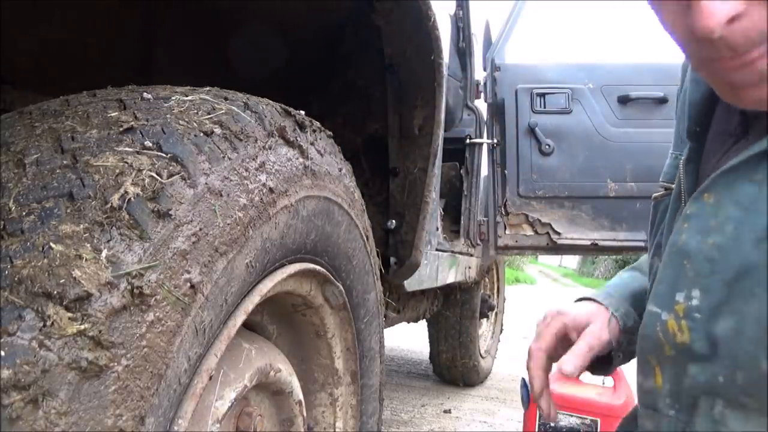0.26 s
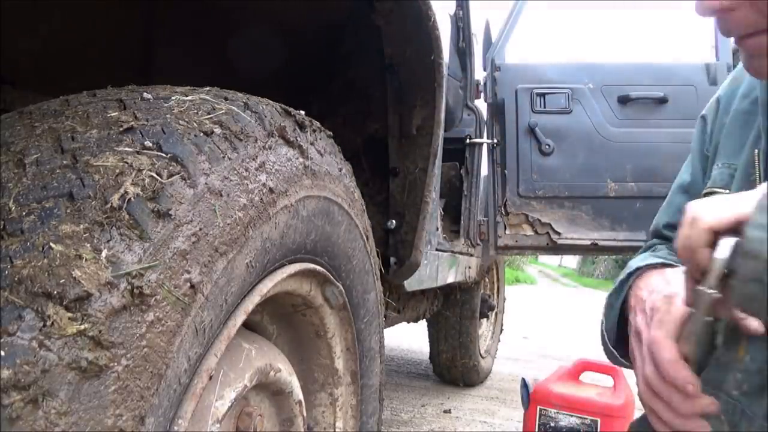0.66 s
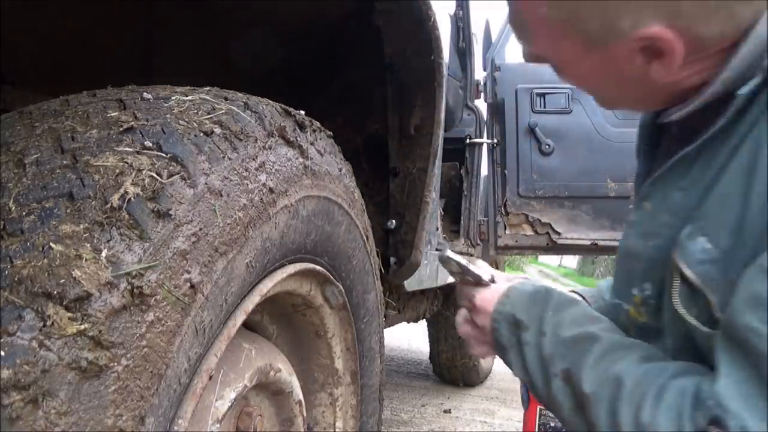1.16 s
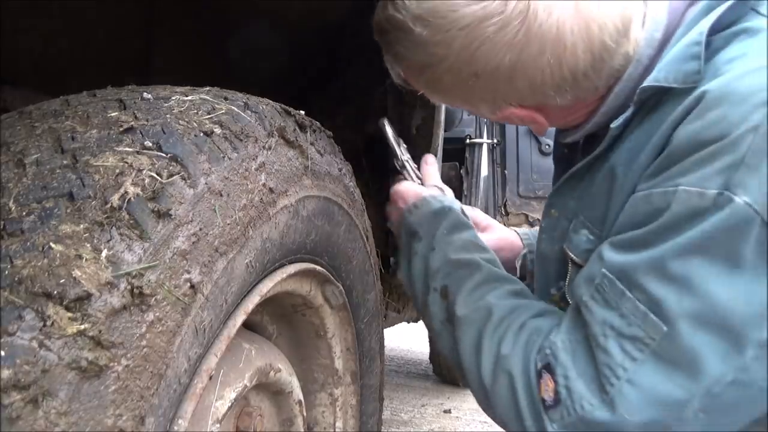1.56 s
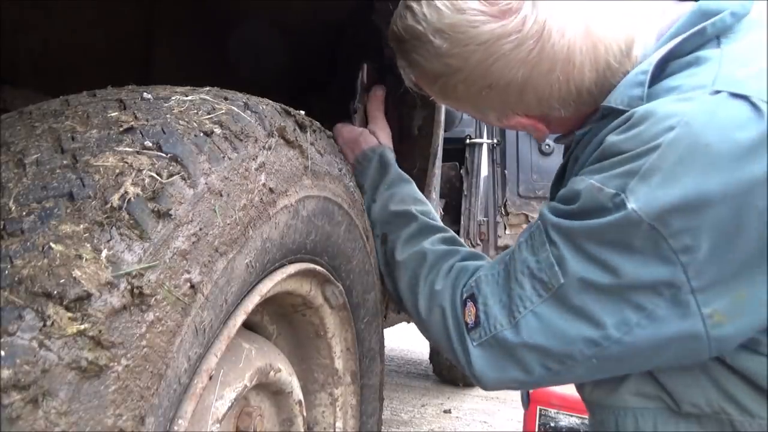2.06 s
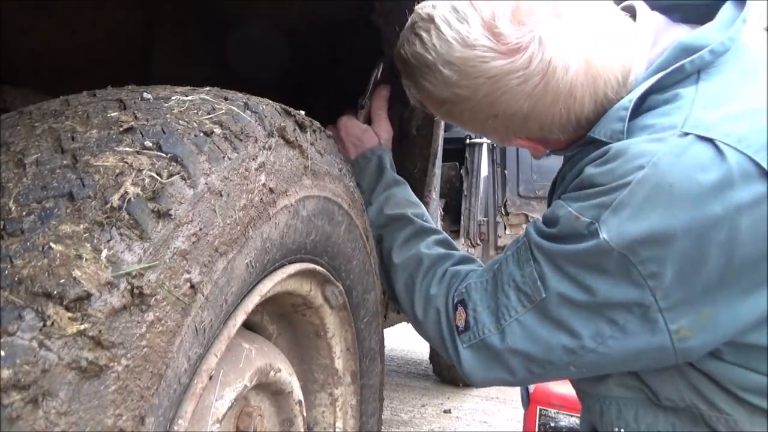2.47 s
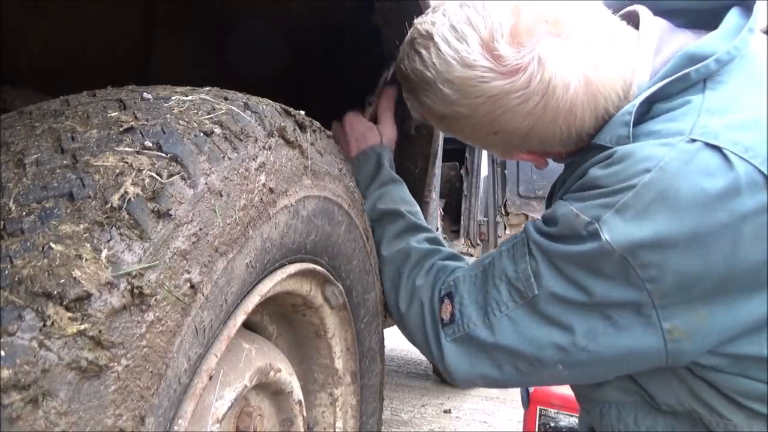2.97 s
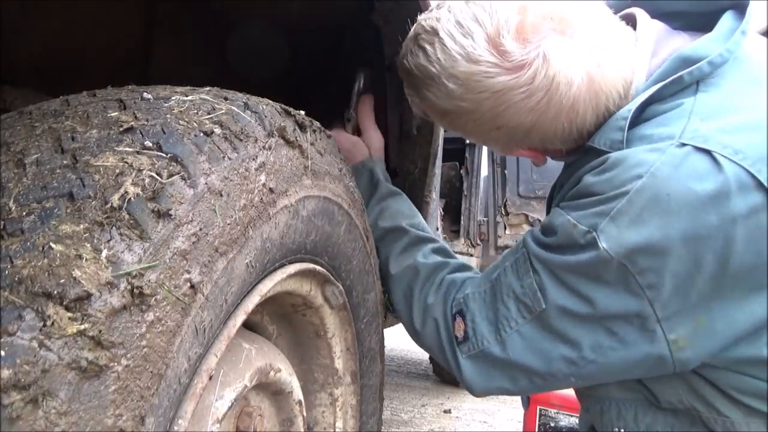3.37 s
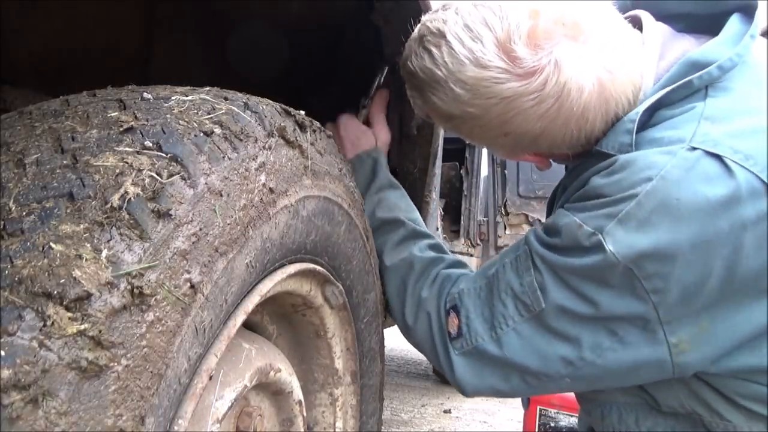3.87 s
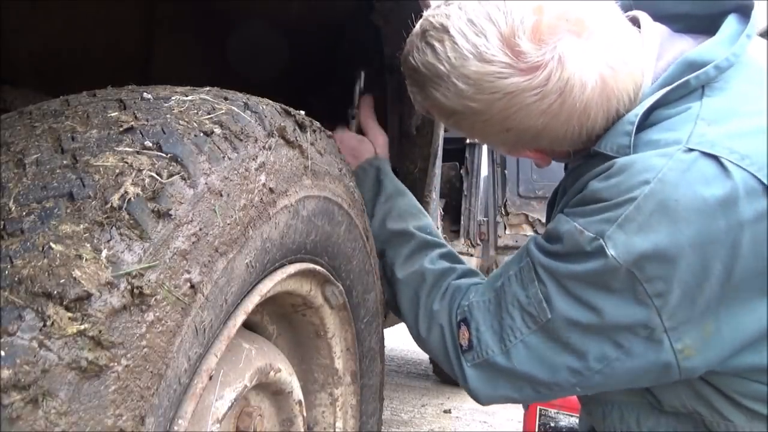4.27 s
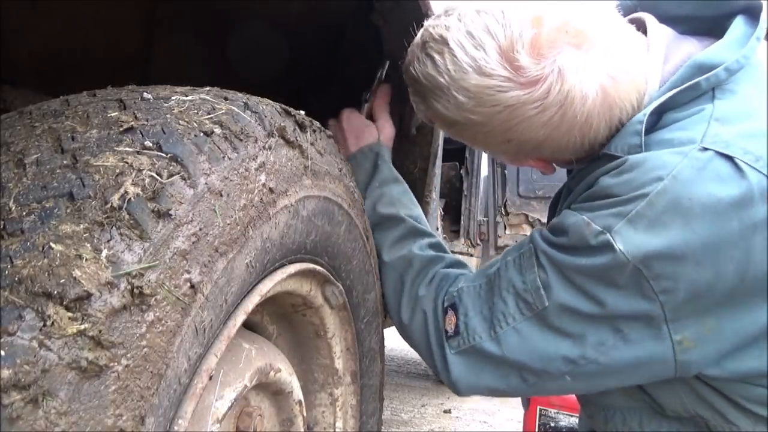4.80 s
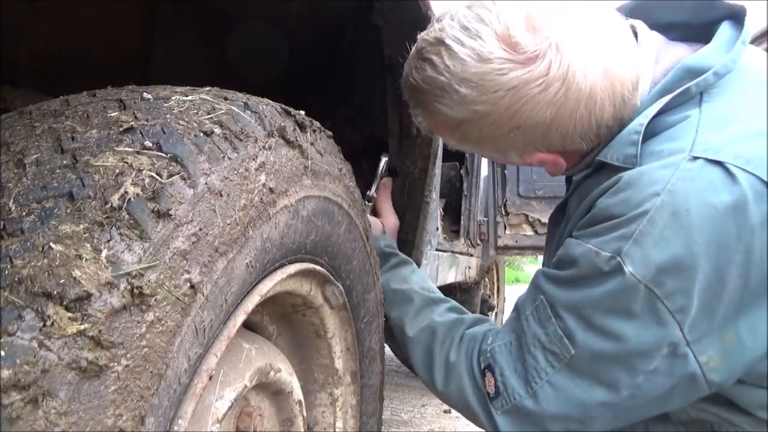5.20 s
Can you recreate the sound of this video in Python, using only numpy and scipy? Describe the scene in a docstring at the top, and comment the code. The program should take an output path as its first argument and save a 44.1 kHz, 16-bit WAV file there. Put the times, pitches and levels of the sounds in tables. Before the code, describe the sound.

Metal hand tools clatter, a jacket rustles with soft wind bumps, then a steel tool strikes metal bodywork in steady sharp blows outdoors.

```python
"""Steel tool on vehicle bodywork

Outdoors, close beside a vehicle, on a two-port microphone: hand tools clatter, a jacket rustles,
then a steel tool strikes pins in the bodywork, each blow a cluster of contacts.
Contacts are decaying noise bands plus ringing modes: a bright crack, a knock of sheet metal, a hollow boom.
Dull thumps, a faint tone, cloth and light wind on the microphone lie over a quiet open-air floor.
Table levels in dB are relative: later gains and filters shift them."""
import sys
import numpy as np
from scipy import signal
from scipy.fft import rfft, irfft
from scipy.io import wavfile

SR = 44100
rng = np.random.default_rng(int(sys.argv[2]) if len(sys.argv) > 2 else 0)


def ratio(d):
    """dB to gain"""
    e = np.asarray(d, float) / 20
    return 10 ** e


def to_wav(s):
    """Save 16-bit WAV."""
    ch = np.atleast_2d(s).T  # columns
    pcm = np.round(np.clip(ch, -1, 1) * 32767)  # PCM
    wavfile.write(sys.argv[1], SR, pcm.astype(np.int16))


N = 239990   # samples


def in_time(rows):
    """Turn the columns of a timed table into sample-rate curves by straight lines."""
    start_s, *columns = np.transpose(rows)
    return [np.interp(np.arange(N) / SR, start_s, column) for column in columns]


def at_hz(points, hz):
    """Read a two-column table on a log-frequency axis."""
    knots_hz, values = np.transpose(points)
    return np.interp(np.log(hz), np.log(knots_hz), values)


def rms_one(x):
    """Scale to unit rms."""
    return x / np.sqrt(np.mean(x ** 2) + 1e-20)


def drift(rate_hz):
    """Random wander of unit rms: noise through two equal low-pass poles at rate_hz."""
    pole = np.exp(-80 * np.pi * rate_hz / SR)   # computed at every 40th sample
    noise = rng.standard_normal(N // 40 + 2002)
    slow = signal.lfilter([1], [1, -2 * pole, pole * pole], noise)[2000:]
    return np.interp(np.arange(N) / 40, np.arange(len(slow)), rms_one(slow))


def clicks(seconds, sizes):
    """Single-sample clicks of the given sizes."""
    return np.bincount((np.asarray(seconds) * SR).astype(int), sizes, N) + 1e-18


def fade(x, t60_s):
    """Every click becomes an exponential decay."""
    return signal.lfilter([1], [1, -ratio(-60 / (t60_s * SR))], x)


def swell(x, seconds):
    """Contact builds up over a short time constant instead of at once."""
    pole = np.exp(-1 / (seconds * SR))
    return signal.lfilter([1 - pole], [1, -pole], x)


def ring(x, hz, t60_s):
    """A resonance: a unit click sets a decaying sine of starting height 1 ringing."""
    radius, turn = ratio(-60 / (t60_s * SR)), 2 * np.pi * hz / SR
    return signal.lfilter([0, np.sin(turn)], [1, -2 * radius * np.cos(turn), radius * radius], x)


# edges of the noise bands [Hz]
BAND_EDGES_HZ = 25 * 2 ** np.arange(0, 9.5, .4)


def bank(envelope, likeness):
    """Stereo noise in narrow bands; envelope(hz) shapes each before its filter, so nothing sounds early."""
    out = 0
    white = rng.standard_normal((2, 2, N))   # neighbouring bands take different noise
    for k, (low, high) in enumerate(zip(BAND_EDGES_HZ, BAND_EDGES_HZ[1:])):
        hz = np.sqrt(low * high)
        band = signal.butter(2, [low, high], "band", fs=SR, output="sos")
        mid, side = signal.sosfilt(band, white[k % 2] * envelope(hz))
        alike = np.clip(at_hz(likeness, hz), 0, 1)
        out = out + np.sqrt(1 + alike) * mid + np.sqrt(1 - alike) * side * [[1], [-1]]
    return out


def colour_db(levels, knots_hz, hz):
    """Level of each contact at one frequency, between its colour knots."""
    return np.array([np.interp(np.log(hz), np.log(knots_hz), row) for row in levels])


def modes(seconds, levels, knots_hz, table, level_db, spread_db, side, rough):
    """Each contact strikes every mode with its own strength; close neighbours make each ring waver."""
    out = np.zeros((2, N))
    for hz, mode_db, t60_s in table:
        chance_db = spread_db * rng.standard_normal(len(seconds))
        strike_db = colour_db(levels, knots_hz, hz) + mode_db + level_db + chance_db
        waver = 1 - rough + rough * drift(50.6)
        tone = ring(clicks(seconds, ratio(strike_db)), hz, t60_s) * waver
        # a wide panel reaches the two ports with a phase offset: add a copy a quarter period late
        late = np.roll(tone, int(SR / hz / 4))
        out += tone + side * rng.choice([-1, 1]) * late * [[1], [-1]]
    return out


def cut_bass(x):
    """Panels radiate nothing below their first mode."""
    return signal.sosfilt(signal.butter(6, 148, "high", fs=SR, output="sos"), x)


def rattle():
    """Loose parts chatter in the tail: a fast random level."""
    return ratio(1.5 * drift(120))


# contacts on the bodywork: start_s [s], sparkle_db near 8 kHz [dB],
# then relative to it: boom_db near 250 Hz [dB], knock_db near 700 Hz [dB]
BLOWS = [(2.7764, -21, -5, 2.5), (2.7788, -13, -6, 6), (3.0533, -11, -12.5, 6), (3.0592, -24.5, 3.5, -5),
         (3.0699, -23, 13.5, 0), (3.3380, -13, 11, 7), (3.346, -15.5, -7, -23), (3.3580, -17, 2.5, 5.5),
         (3.3621, -17, 7, -18.5), (3.419, -36, 11, 7), (3.6296, -8.5, 0.5, -1), (3.66, -15, -10, -9.5),
         (3.798, -55, 23, 21.5), (3.9090, -7, -8.5, 5), (4.1660, -19.5, 5, 5.5),
         (4.1700, -3.5, -8.5, -15.5), (4.1769, -10, -0.5, -5), (4.2524, -24, -10, 6),
         (4.2694, -10, -29, -6), (4.275, -18, 12, -2), (4.307, -56, -4, 4), (4.3160, -29.5, -10, 5),
         (4.5812, -17.5, -2, 3), (4.5831, -4.5, -15.5, -15), (4.5899, -8, -2, -23), (4.8668, -6.5, 3.5, 5),
         (5.1332, -50, 1, 6.5)]
# colour knots of a blow: boom, knock, crack, sparkle, top [Hz]
BLOW_KNOTS_HZ = [250, 700, 3500, 8500, 13000]
# clear modes of the bodywork: pitch_hz [Hz], level_db [dB], t60_s [s]
BODY_MODES = [(167.3, 2.5, 0.22), (205.7, -8, 0.17), (278, 2.5, 0.1), (345.7, -4.5, 0.17),
              (364.7, -17.5, 0.19), (572, -7, .11), (640, -7, .12), (750, -5, .11), (890, -8, .1),
              (1009, -12, .09), (1277, -12, .07), (1450, -10, .07), (1605, -10, .06), (1760, -10, .07),
              (1880, -11, .07), (2068, -13, .06)]
# dense modes of the bodywork: frequency_hz [Hz], density_db [dB per Hz]
BODY_NOISE = [(47, 40), (80, -26.5), (159, -9.5), (441, -12.5), (751, -7), (1170, -26), (1600, -10),
              (2220, -20), (5640, -22.5), (9610, -16.5), (16000, -19)]
# decay of the crack: frequency_hz [Hz], t60_s [s]
CRACK_T60 = [(100, 0.12), (500, 0.14), (2000, 0.031), (8000, 0.02), (15000, 0.0083)]
# decay of the longer tail: frequency_hz [Hz], t60_s [s]
TAIL_T60 = [(100, 0.79), (300, 0.74), (1000, 0.32), (4000, 0.15), (12000, 0.09)]
# contacts at the microphone, blows and clinks: frequency_hz [Hz], left-right likeness [0 to 1]
CONTACT_LIKENESS = [(100, 1), (500, 0.94), (2000, 0.76), (12000, 0.94)]


def blows():
    """Tool on pins: a snap, a crack and a longer tail of dense modes by band, plus clear body and tool modes."""
    start_s, sparkle_db, boom_db, knock_db = np.transpose(BLOWS)
    # a contact that knocks the sheet also cracks more near 3.5 kHz and has less of the very top
    crack_db = 4 + 0.49 * knock_db
    top_db = -14.5 - 0.64 * knock_db
    colour = np.transpose([boom_db, knock_db, crack_db, 0 * start_s, top_db])
    levels = sparkle_db[:, None] + colour
    chatter = rattle()

    def envelope(hz):
        hit_db = colour_db(levels, BLOW_KNOTS_HZ, hz) + at_hz(BODY_NOISE, hz) + 12.5
        hit = clicks(start_s, ratio(hit_db))
        snap = ratio(2.5) * fade(hit, 0.007) / (1 + (2500 / hz) ** 2)
        crack = fade(hit, at_hz(CRACK_T60, hz))
        tail = ratio(-13.5) * chatter * fade(hit, at_hz(TAIL_T60, hz))
        return swell(snap + crack + tail, 0.00042)

    body = modes(start_s, levels, BLOW_KNOTS_HZ, BODY_MODES, level_db=-5, spread_db=3.0, side=0.065, rough=0.27)
    sheet = cut_bass(bank(envelope, CONTACT_LIKENESS) + swell(body, 0.00005))
    return sheet + held_tool(start_s, levels[:, 1:])   # the tool takes all but the boom


# modes of the steel tool: pitch_hz [Hz], level_db [dB], t60_s when hanging free [s]
TOOL_MODES = [(2800, -10, .1), (3838, -11, .12), (4250, -12, .35), (4520, -12, .4), (4888, -13, .35),
              (5076, -13, .35), (6223, -13, .35), (7397, -12, .3), (7644, -7, .13), (7850, -8, .15),
              (8328, -12, .35), (8576, -12, .35), (9300, -9, .15), (9523, -8, .13), (10380, -12, .35),
              (10900, -13, .25), (11410, -12, .15)]
# colour knots of a clink, and of the held tool: knock, middle, sparkle, top [Hz]
CLINK_KNOTS_HZ = [1300, 4000, 8500, 13000]


def held_tool(seconds, levels):
    """Gripped, the tool rings only briefly at every contact."""
    held = [(hz, db, 0.027) for hz, db, t60_s in TOOL_MODES]
    return modes(seconds, levels, CLINK_KNOTS_HZ, held, level_db=-11, spread_db=7.5, side=0.2, rough=0.44)


# tools touching each other: start_s [s], level_db near 4 kHz [dB],
# then relative to it: knock_db near 1.3 kHz [dB], sparkle_db near 8 kHz [dB]
CLINKS = [(0.0014, -19, -11.5, -10.5), (0.0115, -16, -10, -15), (0.0215, -23.5, -1.5, -9),
          (0.0387, -11, -5, 2.5), (0.0481, -5.5, -1, 0.5), (0.0742, -14.5, 6, -10.5),
          (0.082, -20, -11, 1.5), (0.0994, -29, -6, -9.5), (0.1144, -24, -22, -16),
          (0.138, -24.5, -19, -6.5), (0.1535, -21, -17, -2), (0.17, -24, -23, -5.5), (0.1813, -24.5, 2, 4),
          (0.1884, -27, -19, -6), (0.1999, -8, -8.5, -3), (0.251, -38.5, 3, 4.5), (0.315, -56, -10, 20),
          (0.5226, -43, 1, 14), (0.5633, -37.5, -5, -2), (0.886, -57, -17, 29), (0.9732, -38, 12, -24),
          (0.9851, -5, -43.5, 4.5), (1.2064, -57, 18, 7), (1.2945, -49, -19, 26), (1.488, -38, -16, -12),
          (1.689, -36.5, -11, 4), (2.299, -46, -12, 6), (2.3133, -21.5, -16, -0.5), (2.4248, -32, -1, -17),
          (2.438, -40, -15, -9)]
# while the tool is held loosely: from, to [s]
HANGS_FREE_S = (.98, 1.0)


def clinks():
    """Hand tools clatter: short noise with a faint tail, plus tool modes that ring on only when held loosely."""
    start_s, level_db, knock_db, sparkle_db = np.transpose(CLINKS)
    top_db = sparkle_db - 9.5   # the very top follows the sparkle
    colour = np.transpose([knock_db, 0 * start_s, sparkle_db, top_db])
    levels = level_db[:, None] + colour
    chatter = rattle()

    def envelope(hz):
        thin = 1 / (1 + (900 / hz) ** 1.74)   # small tools radiate little bass
        touch = clicks(start_s, ratio(colour_db(levels, CLINK_KNOTS_HZ, hz) + 1.5) * thin)
        tail = ratio(-20.5) * chatter * fade(touch, 0.1)
        return swell(fade(touch, 0.011) + tail, 0.00042)

    free = (start_s > HANGS_FREE_S[0]) & (start_s < HANGS_FREE_S[1])
    loose = modes(start_s[free], levels[free], CLINK_KNOTS_HZ, TOOL_MODES,
                  level_db=-25.5, spread_db=1.0, side=0.15, rough=0.3)
    return cut_bass(bank(envelope, CONTACT_LIKENESS)) + loose + held_tool(start_s, levels)


# close source off to one side: frequency_hz [Hz], phase by which the left port leads [radians]
PORT_PHASE = [(40, .8), (150, .8), (520, .85), (1030, .5), (4400, .15), (8000, .2), (16000, 0)]


def ports(x):
    """A close source off to one side reaches the left microphone port with a small phase lead over the right."""
    hz = np.maximum(np.fft.rfftfreq(N, 1 / SR), 1)
    half_lead = at_hz(PORT_PHASE, hz) / 2
    return irfft(rfft(x) * np.exp(1j * half_lead * [[1], [-1]]), N)


# a hand or knee meets the body: start_s [s], level_db [dB]
THUMPS = [(0.525, -27), (0.927, -26), (0.972, -27), (1.631, -21.5), (1.671, -15.5), (2.019, -47)]


def thumps():
    """Soft knocks: short noise pushes wake only some lower body modes, briefly."""
    start_s, level_db = np.transpose(THUMPS)
    push = rng.standard_normal(N) * swell(fade(clicks(start_s, ratio(level_db - 40)), 0.03), 0.002)
    return sum(ratio(-4 * np.log2(hz / 360)) * ring(push, hz, 0.1) for hz, db, t60_s in BODY_MODES[3:9])


def whistle():
    """A faint wavering tone: noise in one narrow resonance that sets in quickly, holds and dies away."""
    t = np.arange(N) / SR
    attack_db = 600 * np.maximum(0.87 - t, 0)   # 600 dB/s up to 0.87 s
    release_db = 150 * np.maximum(t - 1.16, 0)   # 150 dB/s from 1.16 s
    tone = rms_one(ring(rng.standard_normal(N), 1740, 0.025))
    return ratio(-57 - attack_db - release_db) * tone


# jacket sleeves rubbing: start_s [s], swish_db [dB], rub_db (dull) [dB]
CLOTH = [(0.3, -62.5, -48.5), (0.9, -60.5, -46), (1.07, -56, -43.5), (1.48, -65, -46.5), (1.87, -59, -42.5),
         (2.03, -65.5, -45.5), (2.26, -64.5, -48), (3.1, -78, -58), (4.05, -75, -50.5), (4.4, -80.5, -58.5),
         (5.05, -65.5, -40.5), (5.18, -84, -45.5), (5.44, -77.5, -90.5)]
# single sweeps of a sleeve: centre_s [s], half_length_s [s], level_db [dB]
SWEEPS = [(0.545, 0.039, -54), (0.637, 0.042, -58), (0.953, 0.045, -54.5), (1.017, 0.038, -50),
          (1.226, 0.019, -58), (1.396, 0.043, -59), (1.522, 0.04, -51.5), (1.693, 0.016, -56.5),
          (5.152, 0.033, -65)]
# colour of the swish: frequency_hz [Hz], density_db [dB per Hz]
SWISH = [(2650, -51), (4500, 11), (6390, -20.5), (7820, 18.5), (9660, 7.5), (14500, -16), (16000, -18)]
# colour of the dull rub: frequency_hz [Hz], density_db [dB per Hz]
RUB = [(300, 0), (700, -2), (2000, -5), (4000, -7), (6000, -15.5), (9000, -16.5)]
# jacket, wind and air at the microphone: frequency_hz [Hz], left-right likeness [0 to 1]
BACKGROUND_LIKENESS = [(60, 0.97), (130, 0.97), (290, 0.84), (640, 0.33), (1410, 0.15), (3100, 0.31),
                       (6820, 0.89), (15000, 1)]


def jacket():
    """Grainy rustle: cloth fibres catch and slip, giving a bright swish and a dull rub of random level."""
    t = np.arange(N) / SR
    swish_db, rub_db = in_time(CLOTH)
    grain = ratio(2.2 * drift(80))
    sweeps = sum(ratio(db) * np.exp(-((t - centre_s) / half_s) ** 4) for centre_s, half_s, db in SWEEPS)
    swish = grain * (ratio(swish_db) + sweeps)
    rub = grain * ratio(rub_db)

    def envelope(hz):
        return np.hypot(swish * ratio(at_hz(SWISH, hz)), rub * ratio(at_hz(RUB, hz)))
    return bank(envelope, BACKGROUND_LIKENESS)


# wind on the ports: start_s [s], level_db [dB]
WIND = [(0.04, -40), (0.15, -58), (0.42, -53), (0.62, -24.5), (0.79, -38.5), (0.91, -19.5), (0.99, -51),
        (1.07, -26.5), (1.15, -71), (1.33, -43), (1.51, -21), (1.6, -28), (1.65, -19), (1.75, -39),
        (1.88, -37), (1.99, -23.5), (2.06, -53), (2.3, -38), (2.6, -55)]
# colour of the wind bumps: frequency_hz [Hz], density_db [dB per Hz]
BUMPS = [(15, -37), (25, -1), (102, 6.5), (204, -5.5), (243, -33), (273, -20), (400, -5.5), (520, -29),
         (880, -120)]


def wind():
    """Light wind bumps the ports: low noise in lumps of random level."""
    lumps = ratio(in_time(WIND)[0] + 2.74 * drift(7.6))
    return bank(lambda hz: lumps * ratio(at_hz(BUMPS, hz)), BACKGROUND_LIKENESS)


# colour of the open air: frequency_hz [Hz], density_db [dB per Hz]
AIR = [(15, -52), (25, -22), (48, -2), (102, -9.5), (166, -7.5), (344, -17), (394, -16.5), (1740, -26.5),
       (2000, -33), (2160, -29.5), (16000, -41)]


def air():
    """Quiet open-air floor: steady noise, each band wandering a little on its own."""
    return bank(lambda hz: ratio(-26.5 + at_hz(AIR, hz) + 1.1 * drift(2.8)), BACKGROUND_LIKENESS)


def scene():
    """All sources; the blows and clinks sit slightly left."""
    contacts = ports(blows() + clinks()) * ratio([[0.4], [-0.4]])
    return contacts + thumps() + whistle() + jacket() + wind() + air()


def band_limit(x):
    """A steep low-pass at the top of the band."""
    return signal.sosfilt(signal.butter(12, 16840, fs=SR, output="sos"), x)


def record(dry):
    """Peaks are rounded, then the top octave is rolled off."""
    rounded = np.tanh(dry / 0.92)
    roll_off = signal.cheby2(10, 30, 16200, fs=SR, output="sos")
    mix = 0.96 * signal.sosfilt(roll_off, rounded)
    return band_limit(mix)


dry = scene()
out = record(dry)
to_wav(out)
```